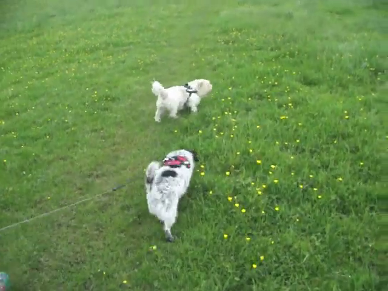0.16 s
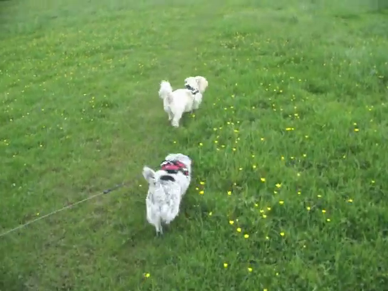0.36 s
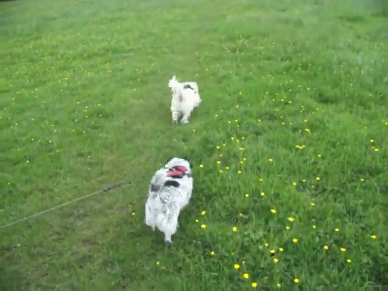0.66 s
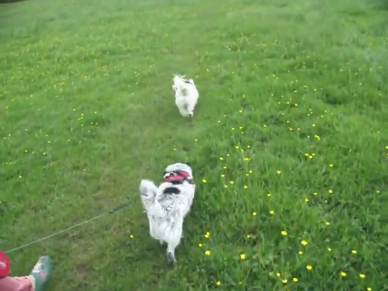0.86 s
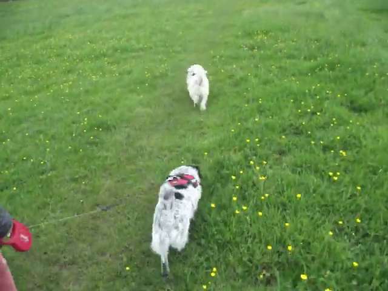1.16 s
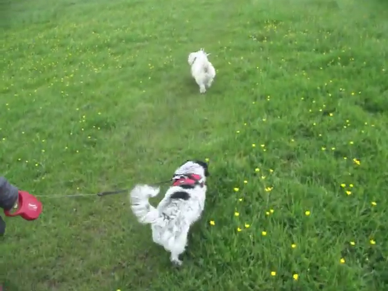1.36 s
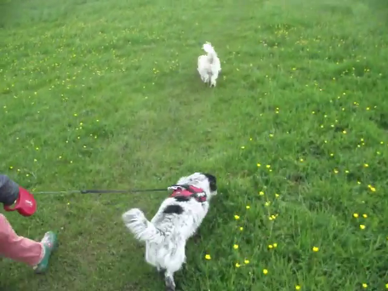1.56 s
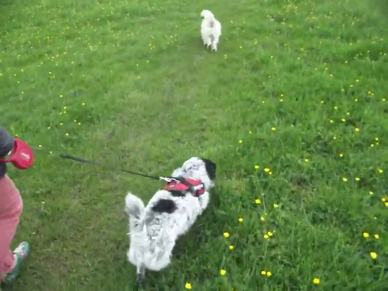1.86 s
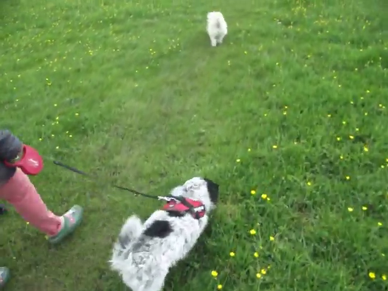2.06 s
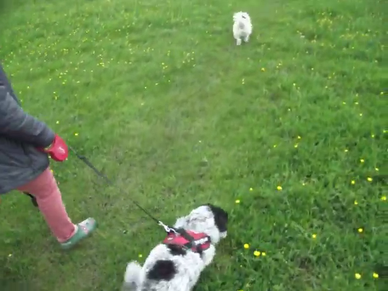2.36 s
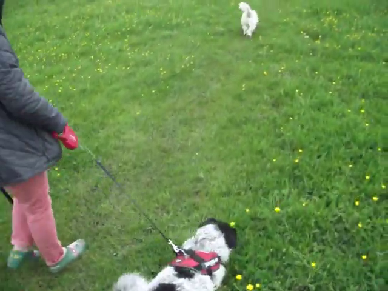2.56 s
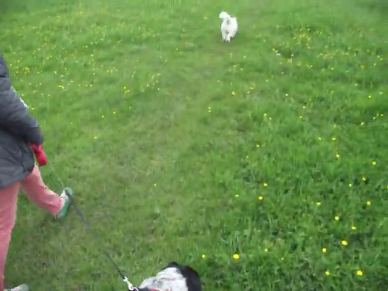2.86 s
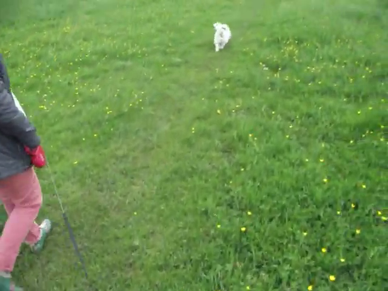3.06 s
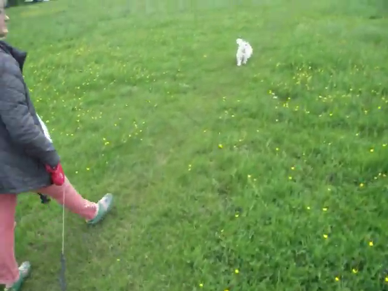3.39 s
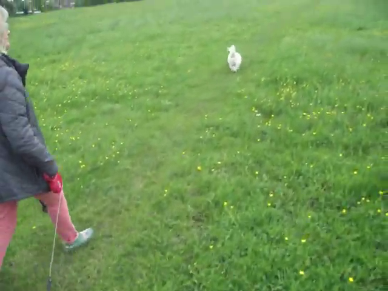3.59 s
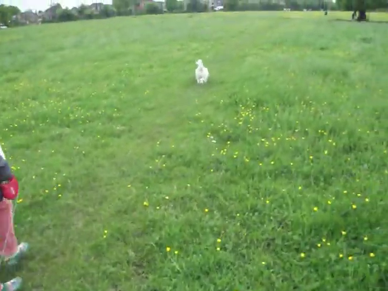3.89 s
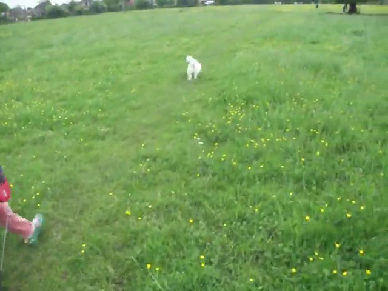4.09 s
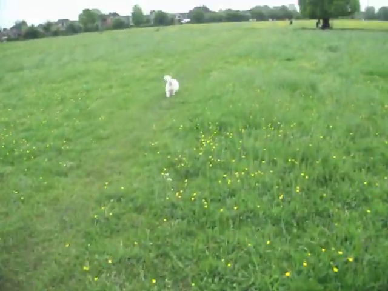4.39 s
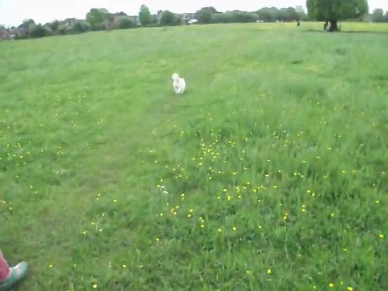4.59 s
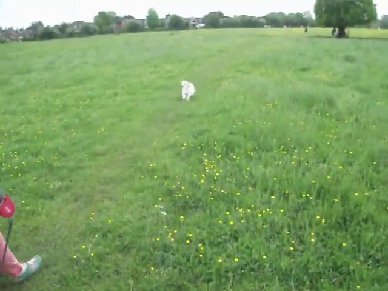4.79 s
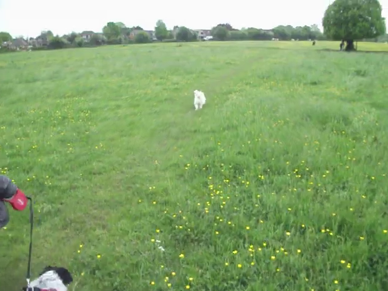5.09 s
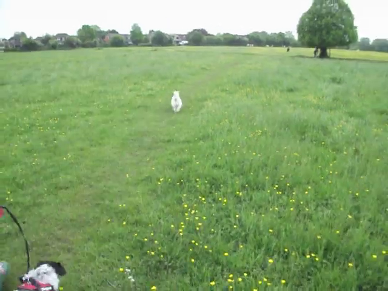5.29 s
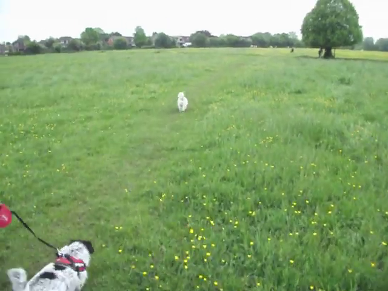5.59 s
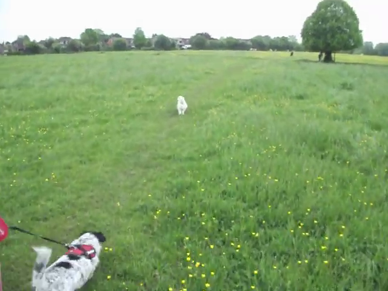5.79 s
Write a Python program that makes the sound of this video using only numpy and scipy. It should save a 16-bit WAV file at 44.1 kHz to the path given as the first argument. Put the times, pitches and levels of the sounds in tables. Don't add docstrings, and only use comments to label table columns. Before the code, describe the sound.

A cheap handheld recorder outdoors: dull, narrow-band and very close. Airy whistling hiss around the middle-high range runs throughout, with strongest low wind thumps at the start and again at the end. Its plastic case ticks irregularly, is scraped by a finger, and takes sharp knocks that clip and make the background dip briefly. A dense rattle around four seconds thins into quieter wind, with no echo from the open meadow.

```python
import sys
import numpy as np
from scipy import signal
from scipy.fft import rfft, irfft
from scipy.io import wavfile
from scipy.ndimage import uniform_filter1d

SR = 44100
rng = np.random.default_rng(int(sys.argv[2]) if len(sys.argv) > 2 else 0)


def amplitude_ratio(level_db):
    exponent = np.asarray(level_db, float) / 20
    return 10 ** exponent


def log_audio(samples):
    frames = np.atleast_2d(samples).T
    limited = np.clip(frames, -1, 1)
    pcm = np.round(limited * 32767).astype(np.int16)
    wavfile.write(sys.argv[1], SR, pcm)


N = 261954


def level(x, db):
    return x * amplitude_ratio(db) / np.sqrt(np.mean(x ** 2))


def curve(table):
    times_s, levels_db = np.transpose(table)
    return np.interp(np.arange(N) / SR, times_s, levels_db)


def band(x, lo_hz, hi_hz, order=2):
    return signal.sosfilt(signal.butter(order, [lo_hz, hi_hz], "band", fs=SR, output="sos"), x)


def lowpass(x, design):
    return signal.sosfilt(design, x)


def ring(x, hz, width_hz):
    b, a = signal.iirpeak(hz, hz / width_hz, SR)
    return signal.lfilter(b, a, signal.lfilter(b, a, x))


def colour(x, points):
    hz, db = np.transpose(points)
    f = np.fft.rfftfreq(len(x), 1 / SR) + 1
    return irfft(rfft(x) * amplitude_ratio(np.interp(np.log(f), np.log(hz), db)), len(x))


def walk(rate_hz):
    hold = int(SR / rate_hz)
    steps = np.repeat(rng.standard_normal(N // hold + 1), hold)
    return uniform_filter1d(uniform_filter1d(steps, hold), hold)[:N]


def add(out, start_s, piece):
    i = int(start_s * SR)
    out[i:i + len(piece)] += piece[:N - i]


def air():
    # time_s, level_db
    flow = [(0.0, -31), (0.36, -32), (1.17, -32), (1.45, -31), (1.67, -28.5), (2.02, -28.5), (2.41, -30),
            (3.08, -30.5), (3.36, -29.5), (3.57, -31.5), (4.38, -31), (4.7, -28.5), (5.08, -30.5),
            (5.94, -32)]
    # frequency_hz, density_db (per Hz)
    port = [(150, -45), (250, -16), (598, -16.5), (930, -13), (1430, -16), (1760, -7.5), (1980, -15.5),
            (2500, 4), (2600, 4), (2770, -4.5), (3200, -9.5), (3740, -24), (5250, -27), (5600, -30.5),
            (7280, -45), (12300, -120)]
    flow_db = curve(flow)
    stems = (rng.random(N) < 400 / SR) * rng.standard_normal(N)
    crackle = stems * amplitude_ratio(3 * np.minimum(rng.exponential(size=N), 3))
    hiss = colour(rng.standard_normal(N) + level(crackle, -6), port)

    cavity = level(ring(rng.standard_normal(N), 2489, 330), -2)
    flicker = amplitude_ratio(2.2 * walk(60))
    whistle = level(level(band(hiss, 2030, 3325, order=3), 0) * flicker + cavity, 0)
    body = level(band(hiss, 260, 2023, order=3), 0)
    top = level(band(hiss, 3935, 10000, order=3), -50)

    body_db = -35.5 + 0.45 * (flow_db + 30) + 1.2 * walk(17)
    top_db = 0.59 * (flow_db + 40.5)
    return whistle * amplitude_ratio(flow_db + 1.5) + body * amplitude_ratio(body_db) + top * amplitude_ratio(top_db)


def buffets(offset_db, db_per_sharpness):
    # peak_s, length_s, strength_db, sharpness_db (small eddies reach higher)
    swells = [(0.048, .06, -17, 5), (0.131, .06, -14, 6), (0.213, 0.055, -24, 8.5), (0.309, .11, -14.5, 12),
              (.45, .12, -25.5, 6), (0.897, .2, -18, 10.5), (1.07, .06, -25.5, -4.5), (1.22, .06, -26, -2),
              (1.457, 0.11, -28.5, 8.5), (1.689, .06, -25.5, 4), (1.872, 0.076, -26, -7),
              (1.97, 0.055, -26, 4), (2.101, 0.039, -26, 5), (2.317, 0.058, -26, -5),
              (2.419, 0.067, -20, 5), (2.62, 0.069, -28, 6), (2.978, 0.092, -24, -6),
              (3.127, 0.055, -27, -6), (3.3, .12, -30, 4), (3.589, 0.073, -27.5, 7.5), (3.85, .1, -30, 4),
              (4.203, .12, -29.5, 8), (4.45, .2, -34, 9.5), (4.998, 0.067, -27, 1.5),
              (5.12, 0.085, -26.5, 3.5), (5.569, 0.052, -20, -6.5), (5.661, 0.056, -23, 10),
              (5.74, .06, -25, -5), (5.852, 0.094, -23, -12)]
    t = np.arange(N) / SR
    return sum(amplitude_ratio(db + offset_db + db_per_sharpness * sharpness_db) * np.exp(-(2 * (t - s) / length_s) ** 2)
               for s, length_s, db, sharpness_db in swells)


def wind():
    # time_s, level_db
    pressure = [
        (0.0, -25),
        (0.92, -26),
        (1.21, -31),
        (2.05, -27.5),
        (3.24, -31.5),
        (5.0, -32.5),
        (5.59, -31),
        (5.79, -26),
        (5.94, -23.5),
    ]
    surge = walk(22)
    deep = level(amplitude_ratio(1.4 * surge) * band(rng.standard_normal(N), 8.94, 38.1), 0)
    thump = level(amplitude_ratio(1.5 * surge) * band(rng.standard_normal(N), 45, 104), 0)
    flutter = level(amplitude_ratio(1.7 * surge) * band(rng.standard_normal(N), 120, 240), 0)

    steady = amplitude_ratio(curve(pressure) - 1)
    deep *= steady + buffets(-2.5, 0)
    thump *= steady * amplitude_ratio(-9.5) + buffets(-15, 0.96)
    flutter *= steady * amplitude_ratio(-25) + buffets(-46, 2.42)
    return deep + thump + flutter


def pops():
    # centre_s, peak_db, swing_hz
    eddies = [
        (.668, -7.5, 62),
        (.922, -12, 55),
        (2.43, -17, 35),
        (3.69, -18, 50),
        (4.27, -25.5, 120),
        (5.006, -17.5, 45),
        (5.665, -16.5, 60),
        (5.912, -8.5, 23.8),
    ]
    t = np.arange(N) / SR
    cycles = 0.48
    return sum(amplitude_ratio(db) * np.sin(2 * np.pi * hz * (t - s)) * np.exp(-((t - s) * hz / cycles) ** 2)
               for s, db, hz in eddies)


def scrapes():
    # start_s, length_s, level_db, ring_hz, width_hz
    strokes = [(1.492, 0.069, -23.5, 1520, 297), (1.493, 0.08, -24, 2300, 404),
               (1.489, 0.16, -32, 900, 1000), (1.5, 0.175, -31.5, 2800, 1000),
               (1.703, 0.033, -19, 2600, 700), (1.723, 0.046, -14, 2566, 795),
               (1.728, 0.043, -18.5, 1876, 594), (1.818, 0.077, -22.5, 2550, 800),
               (2.295, 0.043, -23, 2510, 500), (2.626, 0.046, -23.5, 2570, 500),
               (3.325, 0.076, -24, 2590, 800), (3.41, .045, -28, 2600, 600), (3.49, .05, -28, 2650, 700),
               (5.634, 0.023, -34, 2900, 2490)]
    out = np.zeros(N)
    for s, length_s, db, hz, width_hz in strokes:
        grains_per_s = 2500 * amplitude_ratio(0.9 * (db + 23.5))
        n = min(int(length_s * SR), 8192)
        chance, push, size = rng.random((3, 8192))[:, :n]
        grains = (chance < grains_per_s / SR) * (push - 0.5) * (size + 0.017) ** -0.3
        swell = np.sin(np.pi * (np.arange(n) / n) ** 0.6)
        add(out, s, level(ring(grains, hz, width_hz), db) * swell)
    return out


def bumps():
    # start_s, peak_db, ring_hz
    blows = [(0.304, -26.5, 326), (1.447, -21.5, 526), (1.967, -21, 283), (2.109, -12.5, 380),
             (2.392, -23, 334), (2.428, -26, 283), (2.634, -3.5, 394), (3.538, -27.5, 324),
             (3.914, -27, 490), (3.95, -28, 210), (5.328, -29, 604), (5.659, -29, 296)]
    out, t = np.zeros(N), np.arange(3000) / SR
    for s, db, hz in blows:
        t60_s = 0.0099 - 0.0005 * db
        modes = np.sin(2 * np.pi * hz * t) + 0.48 * np.sin(2 * np.pi * 1.8 * hz * t)
        modes *= 1 - np.exp(-t / 0.00036)
        add(out, s, -amplitude_ratio(db) * modes * 1000. ** (-t / t60_s))
    return out


def case(events, width_hz, rough, second_db, cut, fizz_db):
    out, t = np.zeros(N), np.arange(1500) / SR
    for s, db, hz, length_ms, snap_db in events:
        noise = rng.standard_normal(len(t))
        u = t * 1000 / max(length_ms, 0.2)
        blow = u * np.exp(-u ** cut)
        after_rattle = 0.035 * u * np.exp(-0.55 * u)
        shape = blow + after_rattle
        pair = np.sin(2 * np.pi * hz * t) + amplitude_ratio(second_db) * np.sin(2 * np.pi * 1.13 * hz * t)

        mode = ring(shape * (pair + rough * noise), hz, width_hz)
        snap = band(shape * noise, 1300, 2900)
        fizz = band(shape * noise, 3100, 5800)
        hit = mode / abs(mode).max()
        hit += amplitude_ratio(snap_db) * snap / abs(snap).max()
        hit += amplitude_ratio(snap_db + fizz_db) * fizz / abs(fizz).max()
        add(out, s, amplitude_ratio(db) * hit)
    return out


def ticks():
    # start_s, peak_db, ring_hz
    slips = [(0.0313, -13.5, 3030), (0.7318, -14.5, 3140), (0.8325, -13.5, 2666), (0.9228, -16, 3070),
             (1.0075, -13.5, 2990), (1.0935, -11, 2900), (1.1679, -18.5, 2840), (1.1735, -15.5, 3200),
             (1.4325, -21.5, 3000), (1.676, -12, 2990), (1.8544, -19, 2740), (1.9457, -8, 2866),
             (1.9758, -12, 2750), (1.9824, -18.5, 3100), (2.9328, -19, 2850), (3.6944, -15, 3310),
             (3.7971, -12.5, 2645), (3.8863, -17.5, 3250), (3.9555, -8, 2980), (3.9653, -14, 2980),
             (3.9963, -11, 2740), (4.0294, -8.5, 2780), (4.0606, -7.5, 2800), (4.0648, -13.5, 2800),
             (4.112, -14.5, 3020), (4.3994, -11.5, 2817), (4.5032, -8, 2985), (4.5977, -13, 2960),
             (4.7633, -14.5, 3050), (4.8448, -19, 3100),
             (1.776, -20, 3430),
        (4.9834, -23, 2750),
        (5.33, -26, 2900),
        (5.64, -24, 3000),
    ]
    events = [(s, db, hz, 2.82, -14.5 - 0.2 * db) for s, db, hz in slips]
    return case(events, width_hz=640, rough=5.6, second_db=-11.5, cut=1.24, fizz_db=-9)


def clicks():
    # start_s, peak_db, ring_hz, snap_db
    snaps = [(0.692, -16, 2600, -8), (1.2494, -14, 2740, -11), (1.503, -12.5, 2290, -7),
             (1.602, -8, 2570, -10.5), (1.745, -7, 2800, -15.0), (1.7591, -1.5, 2600, -15),
             (1.825, -10, 2790, -5.5), (1.8694, -13, 2800, -5), (1.943, -12, 3100, -9),
             (2.244, -7, 2690, -6.5), (2.5057, -3, 2680, -10), (4.0812, -8.5, 2690, -12),
             (4.4508, -5, 2740, -29), (4.6714, -13, 3010, -6), (4.68, -14, 2510, -7),
             (5.687, -8, 2690, -19)]
    events = [(s, db, hz, 1 - 0.03 * db, snap_db) for s, db, hz, snap_db in snaps]
    return case(events, width_hz=560, rough=0.42, second_db=-14.5, cut=2.7, fizz_db=-16)


def through_case(x):
    low = lowpass(x, signal.butter(6, 3550, fs=SR, output="sos"))
    return low + amplitude_ratio(-4.5) * band(x, 4250, 5600)


def knocks():
    # start_s, peak_db, ring_hz, rattle_ms, snap_db
    blows = [(1.7288, 5.5, 2760, 0.62, -6), (1.7401, -1, 2600, 0.7, -11), (2.1091, 7, 2290, 0.69, -9),
             (2.3297, 8, 2720, 2.5, -24), (2.3721, -1, 2740, 1.2, -22), (3.4531, 10, 2720, 1.05, -12),
             (2.3974, 6, 2340, 1.47, -2), (2.4830, 2, 2700, 1.8, -10), (2.6575, -0.95, 2646, 1.45, -42),
             (3.5387, 6, 2390, 1.39, -7.5), (4.097, 11, 2720, 1.3, -38)]
    return case(blows, width_hz=1630, rough=0.48, second_db=-12, cut=2.45, fizz_db=-24)


def scene():
    weather = air() + wind() + pops()
    rattles = through_case(scrapes() + ticks() + clicks())
    return (weather + bumps() + rattles + knocks())[None]


def limiter():
    # start_s, dip_db
    ducks = [
        (1.7413, -9),
        (2.1105, -3),
        (2.3346, -17),
        (2.4862, -6),
        (3.456, -17),
        (4.0996, -3),
    ]
    db, t = np.zeros(N), np.arange(2600) / SR
    for s, dip_db in ducks:
        drop = 1 - np.exp(-t / 0.0078)
        recovery = np.exp(-(t / 0.0207) ** 3)
        add(db, s, dip_db * drop * recovery)
    return amplitude_ratio(db)


def top_cut(x):
    return signal.sosfilt(signal.butter(12, 16500, fs=SR, output="sos"), x)


def record(dry):
    input_top, ceiling, offset = 0.73, 0.715, -0.0156
    saturated = np.clip(dry[0] * limiter(), -input_top, input_top)
    narrow = lowpass(saturated, signal.ellip(8, 0.3, 75, 5607, fs=SR, output="sos"))
    clipped = np.clip(narrow, -ceiling, ceiling) + offset
    return top_cut(clipped[None])


dry = scene()
out = record(dry)
log_audio(out)
```